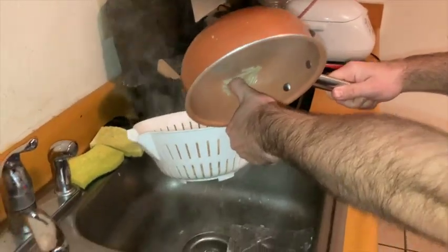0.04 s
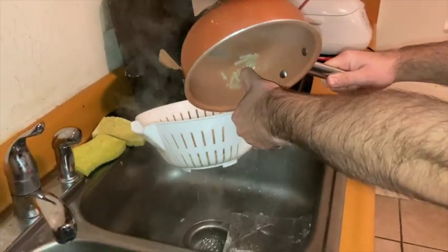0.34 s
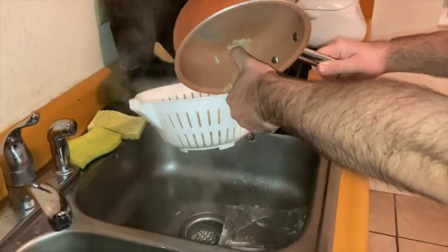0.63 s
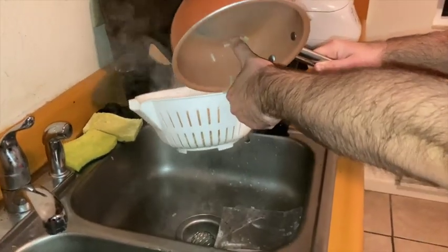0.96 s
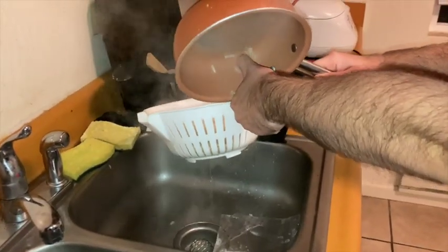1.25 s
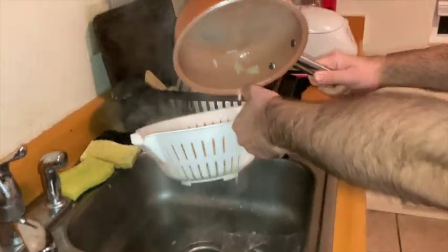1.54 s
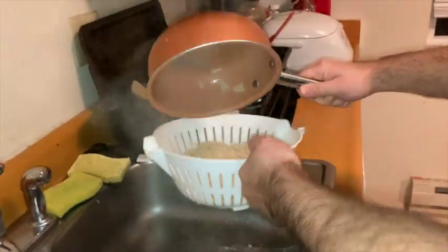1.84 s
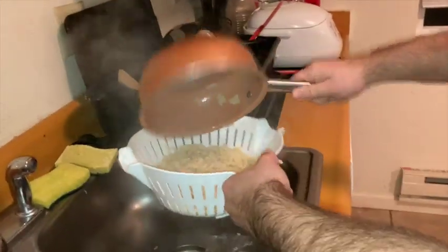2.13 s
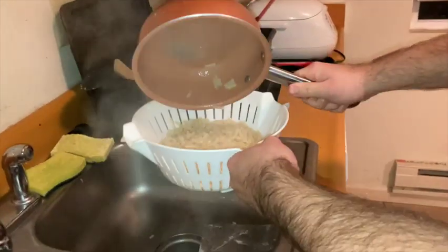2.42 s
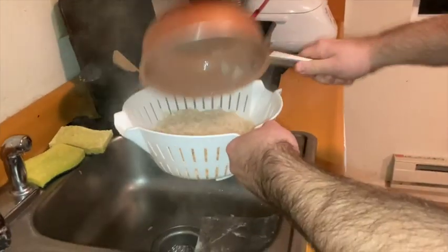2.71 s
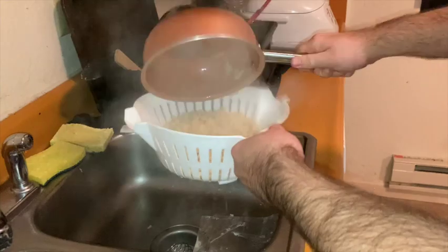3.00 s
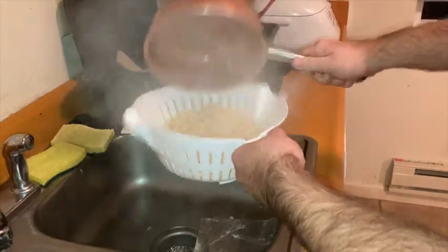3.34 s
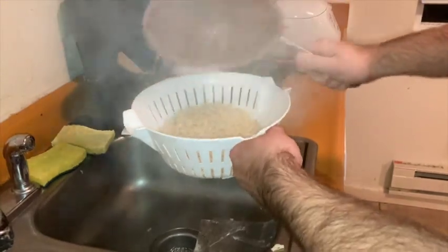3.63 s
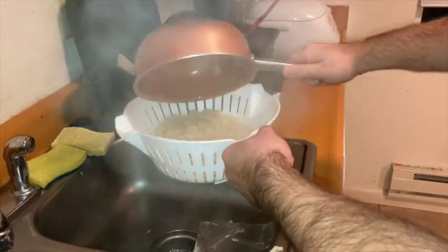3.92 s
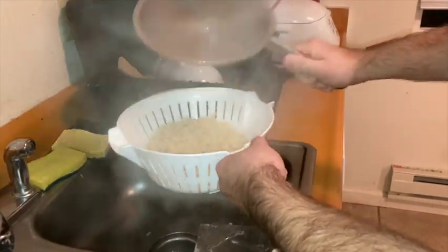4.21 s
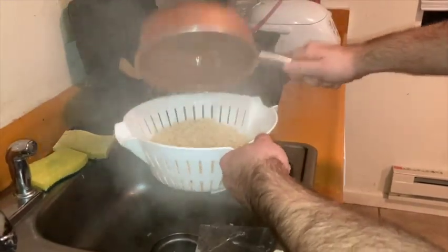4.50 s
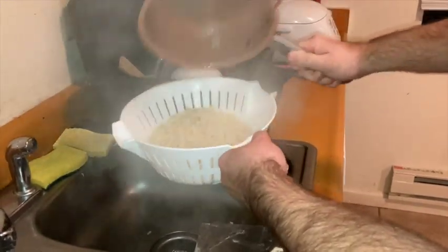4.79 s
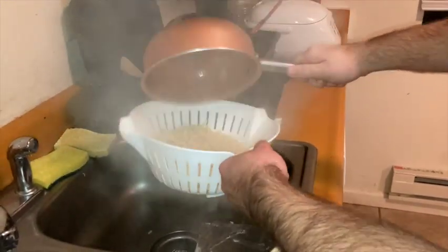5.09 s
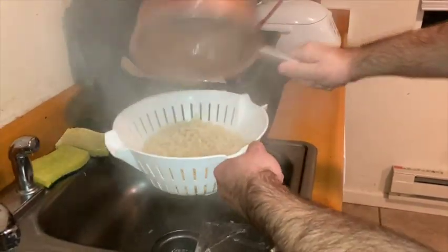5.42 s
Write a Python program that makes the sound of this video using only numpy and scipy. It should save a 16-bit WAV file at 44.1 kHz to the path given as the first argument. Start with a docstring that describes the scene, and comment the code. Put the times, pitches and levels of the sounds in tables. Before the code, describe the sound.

The sound is close, above the sink in a small kitchen with short, hard reflections and a faint, low fan hum throughout. For the first 2.5 seconds, fingers sweep wet pasta from a metal saucepan, making quiet sticky smacks and tiny pops with faint rubbing. The pan gives a dull bump on a plastic colander at about 0.6 seconds and softer ones between 1.1 and 1.3, where clumps land with low plops. A sharper wet smack and plop come at 1.7, and another bump at 2.3. From 2.5 seconds to the end at about 5.5, the pan knocks hard on the colander's rim seventeen times, evenly, about five a second. These are much louder, hollow plastic clacks, each slightly different in tone, with a faint metallic ring and often a light rebounding tap. The strongest fall around 3.5 to 3.7 seconds.

```python
"""Wet smacks and soft bumps: fingers sweep drained pasta from a metal saucepan into a plastic colander.
Then the pan is knocked hard on the rim, five times a second, to shake the pasta out over the sink.
Each knock clacks the colander's modes, rings the pan faintly, and mostly sets the rim rebounding.
The pasta peels off in tiny pops, the fingers stick and slip on the metal,
and a small hard kitchen with a humming fan answers."""
import sys
import numpy as np
from scipy import signal
from scipy.fft import rfft, irfft
from scipy.io import wavfile

SR = 44100
rng = np.random.default_rng(int(sys.argv[2]) if len(sys.argv) > 2 else 0)


def log_audio(samples):
    """Write samples as a 16-bit WAV file to the path given in sys.argv[1]."""
    # one column per channel
    frames = np.atleast_2d(samples).T
    # limit to full scale, then quantise
    limited = np.clip(frames, -1, 1)
    pcm = np.round(limited * 32767).astype(np.int16)
    wavfile.write(sys.argv[1], SR, pcm)


N = 244755
SIZE = 16384  # samples in a one-shot
T, HZ = np.arange(SIZE) / SR, np.fft.rfftfreq(SIZE, 1 / SR)


# hard hits of pan on rim: t/s, level/dB, thud/dB, boom/dB, hollow/dB (high if square, low if glancing),
# hollow/Hz, clack/dB, clack/Hz, rim note/Hz, rim note/dB, tick/dB, contact/s
KNOCK_HITS = [(2.498, -10.5, 0.5, -20, 5, 630, -12, 1140, 2570, 6, -3, 0.0028),
              (2.67, -10, -13, 11, -13, 685, 0.5, 1210, 3270, 8.5, 1, 0.0036),
              (2.8159, -18, 13, -1, 10.5, 640, 4.5, 1090, 3480, 16, 6, 0.0036),
              (2.9961, -10.5, 6, -2.5, 7.5, 590, -1, 885, 1825, 8, -2.5, 0.0012),
              (3.167, -8, 8, 4.5, 0, 605, 1.5, 1150, 3280, 8.5, 4, 0.0021),
              (3.344, -9.5, 0, 7, 5.5, 700, -4.5, 1000, 1740, 3, 7.5, 0.0044),
              (3.534, -1.5, -7, 4, -6, 646, -2, 1460, 2810, 1.5, -5, 0.0026),
              (3.7054, -4, -.5, 1.5, -8.5, 720, 1.5, 1210, 1680, 5, -0.5, .005),
              (3.9119, -6, -8, 4.5, -9.5, 700, -3, 1000, 5150, 7, 1.5, 0.0064),
              (4.076, -6, 4, -3.5, 8.5, 685, -3.5, 910, 1790, -1, 1.5, 0.0011),
              (4.2806, -5, -2.5, -1.5, -4, 527, 2.5, 1250, 2090, 11.5, 0, 0.0064),
              (4.4578, -8, 6, -2.5, 6, 690, -2.5, 1200, 4350, 6, 4.5, 0.0014),
              (4.661, -11, 6, -7, 8.5, 640, 2.5, 1290, 2600, 11.5, 3.5, 0.0019),
              (4.85, -7, 4.5, 3, 2, 720, -0.5, 1180, 4000, 5.5, 2, .0035),
              (5.0596, -8.5, 5, -8, -4, 660, 4.5, 1190, 1635, -5, 3.5, .004),
              (5.2577, -7.5, 4.5, 1.5, 10.5, 583, -3.5, 1230, 1835, 12.5, 4, 0.0021),
              (5.469, -8, 5.5, -5.5, -3, 593, 3.5, 1216, 5100, 6, 6.5, 0.015)]
# EQ of a bare contact: f/Hz, level/dB
BARE_EQ = [(120, 6), (200, 0.5), (280, 2), (450, 3.5), (630, 0.5), (850, 5.5), (1200, 2), (3500, 3.5),
           (10000, -2.5)]

def knocks(ring_db=6.5, room_share=0.35):
    """Each knock clacks the colander and rings the pan, the more so when it lands squarely."""
    out = np.zeros((2, N))
    for (s, db, thud_db, boom_db, hollow_db, hollow_hz,
         clack_db, clack_hz, rim_hz, rim_db, tick_db, contact_s) in KNOCK_HITS:
        spot = spot_eq(hollow_hz, clack_hz, rim_hz, rim_db)
        # part of the spot's emphasis radiates all round, the rest only toward the listener
        colour = contact_eq(thud_db, boom_db, hollow_db, clack_db, tick_db) + room_share * spot
        blow = equalise(colander(contact_s), db + curve(BARE_EQ, HZ) + colour)
        ring = amp(db + ring_db + hollow_db) * pan(db)
        add(out, s, kitchen(blow + ring, direct_db=(1 - room_share) * spot + node_eq()))
    return out


# the colander's distinct modes: f/Hz, resonance height/dB, t60/s
COLANDER_MODES = [(114, 14, 0.054), (188, 18.5, 0.041), (264.3, 22.5, 0.078), (327.5, 17, 0.084),
                  (421, 13.5, 0.029), (518, 21, 0.064), (613, 25.5, 0.045), (717, 23.5, 0.039),
                  (886, 21, 0.031), (1058, 22, 0.019), (1217, 23, 0.03), (1429, 21, 0.027),
                  (1654, 19, 0.044), (1831, 20.5, 0.05), (2180, 18.5, 0.06), (2943, 17.5, 0.016),
                  (3500, 7.5, 0.0082), (4096, 22, 0.026)]
# EQ of its wash of crowded modes: f/Hz, level/dB
WASH_EQ = [(100, 2.5), (400, 2.5), (650, 21.5), (950, 1.5), (1500, 13), (2300, 13), (3500, 15.5),
           (6500, 17), (7800, 17.5), (8800, 19), (10400, 22.5), (11500, 21), (13000, 14), (15500, 10),
           (17000, -14)]

def colander(contact_s, damping=1, snap_s=0.00028, snap_db=2, wash_t60=0.096, wash_db=-7, modes_db=-1):
    """One blow on plastic: a snap, brief chatter, a wash of crowded modes and a few distinct ones."""
    attack = 1 - np.exp(-T / 0.00033)
    contact = amp(snap_db) * np.exp(-(T / snap_s) ** 2) + np.exp(-(T / contact_s) ** 2)
    envelope = (contact + amp(wash_db) * decay(wash_t60)) * attack
    spectrum = rfft(rng.standard_normal(SIZE) * envelope)
    wash = irfft(spectrum / np.abs(spectrum) ** 0.57) * decay(0.21)  # overlapping modes even out
    sound = equalise(wash / np.linalg.norm(wash), curve(WASH_EQ, HZ))
    for k, (hz, db, t60) in enumerate(COLANDER_MODES):
        pitch = hz * (1 + 0.0097 * rng.uniform(-0.59, 1))  # modes shift with the load
        gain = amp(db + modes_db) * 2 * np.log(1000) / (t60 * SR)
        ring = np.sqrt(damping) * decay(t60 / damping) * np.sin(2 * np.pi * pitch * T)
        sound += (-1) ** k * gain * ring * attack
    return disperse(sound)


def disperse(x, crossing_s=0.001619):
    """High bending waves outrun low ones, so the tick leads the body; crossing_s holds at 1 kHz."""
    turns = crossing_s * (2 * np.sqrt(1000 * HZ) - np.sqrt(1000 / HZ[-1]) * HZ)
    return irfft(rfft(x) * np.exp(-2j * np.pi * turns))


def contact_eq(thud_db, boom_db=0, hollow_db=0, clack_db=0, tick_db=0):
    """Tone of a hit in dB: squareness sets thud, boom and hollow note; the spot sets clack and tick."""
    thud = thud_db / (1 + (HZ / 317) ** 4)  # low shelf: the loaded bowl
    boom = boom_db * bell(hz=256, octaves=0.21)  # the bowl's strongest low mode
    hollow = hollow_db * bell(hz=625, octaves=0.27)
    clack = clack_db * bell(hz=1110, octaves=0.75)
    tick = tick_db * (1 - 1 / (1 + (HZ / 7450) ** 4))  # high shelf: a sharp contact
    return thud + boom + hollow + clack + tick


def spot_eq(hollow_hz, clack_hz, rim_hz, rim_db, hollow_db=3, clack_db=6.5):
    """The struck spot singles out a hollow mode, a clack mode and a high rim note: narrow bells in dB."""
    peaks = [(hollow_hz, hollow_db), (clack_hz, clack_db), (rim_hz, rim_db)]
    return sum(db * bell(hz, octaves=0.09) for hz, db in peaks)


def node_eq(spread_db=1.6):
    """A hit falls near nodes of some upper modes and crests of others: a random ripple in dB."""
    hz = np.geomspace(1400, 9000, num=24)
    ripple = spread_db * rng.standard_normal(len(hz) - 2)
    return np.interp(HZ, hz, np.pad(ripple, 1))


# the hand-damped pan, whose nearly round wall splits modes into beating pairs: f/Hz, level/dB, t60/s
PAN_MODES = [(845, -53, .19), (882, -56, .17), (1179, -57, .28), (1270, -64, .3), (2075, -52, .36),
             (2098, -50, .42), (2842, -56, .35)]

def pan(strength_db, spread_db=2.5, detune=0.004):
    """Thin metal ring: softer blows favour the low modes, and the grip shifts each pitch a little."""
    hz, db, t60 = np.transpose(PAN_MODES)[:, :, None]
    louder, sharper = rng.standard_normal((2, len(PAN_MODES), 1))
    tilt_db = 0.3 * strength_db * np.log2(hz / 2000)
    gain = amp(db + spread_db * louder + tilt_db)
    pitch = hz * (1 + detune * sharper)
    return np.sum(gain * decay(t60) * np.sin(2 * np.pi * pitch * T), axis=0)


# ghost hits after a contact: t/s, level/dB
REBOUND_HITS = [(0.7077, -40), (3.005, -19.5), (3.189, -17), (3.353, -14), (3.355, -19), (3.5503, -17.5),
                (3.717, -20), (4.0856, -15.5), (4.0954, -16.5), (4.2856, -37), (4.469, -17), (4.6689, -20),
                (4.6816, -19), (4.871, -16), (4.8906, -21), (5.078, -34), (5.08, -20), (5.2665, -13.5),
                (5.2701, -20), (5.489, -12.5), (5.5008, -15.5)]
# EQ of a light contact: f/Hz, level/dB
REBOUND_EQ = [(150, 4), (600, 4.5), (1300, 8), (5000, 4.5), (12000, -2.5)]

def rebounds():
    """The springy rim comes back against the pan in a light tap or two."""
    out = np.zeros((2, N))
    for s, db in REBOUND_HITS:
        tap = equalise(colander(contact_s=0.0053), db + curve(REBOUND_EQ, HZ))
        add(out, s, kitchen(tap, direct_db=node_eq()))
    return out


# soft hits during the sweep: t/s, level/dB, thud/dB, treble/dB, pan ring/dB
BUMP_HITS = [(0.6419, -14, 0, -4.5, 7), (1.067, -25.5, 8, -4.5, -4), (1.1638, -31.5, 16, -8, -8.5),
             (1.241, -30.5, 6, 3, -15.5), (2.346, -20.5, -32, 2, -10.5)]
# EQ of a cushioned contact: f/Hz, level/dB
CUSHIONED_EQ = [(250, 6), (600, 8), (860, 2), (1350, 6), (2000, 3), (3500, -2.5), (7000, -13), (11000, -20)]
# the hand inside the pan mutes its upper modes: f/Hz, level/dB
PALM_EQ = [(1300, 0), (2000, -18)]

def bumps(cushion_db=-20):
    """Cushioned by hand and pasta, the pan nudges the rim: a dull, damped hit; its low notes hum on."""
    out = np.zeros((2, N))
    treble = curve([(1200, 0), (4000, 1)], HZ)
    for s, db, thud_db, treble_db, ring_db in BUMP_HITS:
        colour = curve(CUSHIONED_EQ, HZ) + contact_eq(thud_db) + treble_db * treble
        blow = equalise(colander(contact_s=0.0063, damping=1.5), db + colour)
        ring = equalise(pan(db + cushion_db), ring_db + curve(PALM_EQ, HZ))
        add(out, s, kitchen(blow + ring))
    return out


# wet smacks, long where the pasta slides off: t/s, level/dB, decay/s, brightness/dB
PASTA_SMACKS = [(0.021, -49.5, 0.019, -2), (0.088, -61, 0.01, -3), (0.315, -69, 0.002, 8),
                (0.469, -54.5, 0.013, 0), (0.563, -53, 0.011, -6), (1.026, -62, 0.05, 19),
                (1.172, -44.5, 0.039, -1), (1.208, -37, 0.002, 7), (1.263, -38, 0.0034, -17),
                (1.252, -38.5, 0.0092, -21), (1.41, -50.5, 0.024, 6), (1.701, -38, 0.0087, 10.5),
                (1.709, -28, 0.0083, 0.5), (1.769, -48, 0.004, 17.5), (1.872, -45.5, 0.0069, 4),
                (1.89, -53.5, 0.0056, 27.5), (1.943, -48, 0.0091, 3), (2.249, -47.5, 0.054, -1),
                (2.417, -47.5, 0.48, 1)]

def pasta(pops_per_s=1800, smack_db=-9, sweep_s=2.5, strays_per_s=12, stray_db=-62):
    """Wet pasta peels off the pan in bursts of tiny pops, with a faint stray crackle in between."""
    out = np.zeros((2, N))
    wet_eq = curve([(100, -25), (600, 12.5), (1500, 4.5), (3000, 2.5),
                    (6000, -2), (11000, -5), (16000, -15)], HZ)
    tilt = curve([(1500, -0.5), (10000, 1)], HZ)
    for s, db, decay_s, bright_db in PASTA_SMACKS:
        envelope = np.exp(-T / decay_s) * (1 - np.exp(-T / (0.13 * decay_s)))
        burst = unit_rms(crackle(pops_per_s) * envelope) * np.sqrt(decay_s / (2 * T[-1]))
        add(out, s, kitchen(equalise(burst, db + smack_db + wet_eq + bright_db * tilt)))
    for s in rng.uniform(0, sweep_s, round(sweep_s * strays_per_s)):
        pop = rng.standard_normal(SIZE) * decay(0.013)
        db = stray_db + 4 * rng.standard_normal()
        add(out, s, kitchen(equalise(pop, db + wet_eq)))
    return out


# low plops of landing pasta: t/s, f/Hz, level/dB, t60/s
CLUMP_PLOPS = [(1.075, 260, -36, 0.12), (1.245, 71, -33.5, 0.32), (1.248, 155, -33.5, 0.096),
               (1.709, 202.6, -30.5, 0.21), (1.713, 262, -34, 0.4)]

def clumps(attack_s=0.0065):
    """Clumps drop into the colander, each a dull, soft-edged low tone."""
    out = np.zeros((2, N))
    for s, hz, db, t60 in CLUMP_PLOPS:
        envelope = amp(db) * decay(t60) * (1 - np.exp(-T / attack_s))
        add(out, s, to_ports(envelope * np.sin(2 * np.pi * hz * T)))
    return out


# finger strokes along the pan: t/s, length/s, level/dB
RUB_STROKES = [(1.141, 0.096, -59), (1.262, 0.032, -49.5), (1.352, 0.081, -53), (1.634, 0.081, -55)]
# resonances the rubbing stirs: f/Hz, level/dB
RUB_EQ = [(200, -2), (430, -6), (520, 10), (580, -2), (645, 3), (760, -8), (890, -6), (980, 0), (1090, 4),
          (1400, -13), (4000, -28), (12000, -45)]
# fingertip chirps: t/s, f/Hz, level/dB, length/s
FINGER_SQUEAKS = [(0.3115, 3850, -57, 0.006), (1.2125, 4400, -42, 0.005)]

def fingers(slips_per_s=300, jitter=0.29):
    """Wet fingers stick and slip on the pan in short strokes; very quick slips make a rough squeak."""
    out = np.zeros((2, N))
    for s, length, db in RUB_STROKES:
        rub = unit_rms(equalise(crackle(slips_per_s), curve(RUB_EQ, HZ)))
        add(out, s, kitchen(amp(db) * swell(length) * rub))
    for s, hz, db, length in FINGER_SQUEAKS:
        turns = np.cumsum(hz * (1 + jitter * rng.standard_normal(SIZE))) / SR
        squeak = amp(db) * swell(length) * np.sin(2 * np.pi * turns)
        add(out, s, kitchen(squeak, reverb_db=-11))
    return out


# reverb EQ: f/Hz, level/dB
REVERB_EQ = [(100, -6.5), (260, 8.5), (500, 0), (1000, -1), (1500, 0), (2500, 1), (5000, -1.5),
             (10000, -2.5), (15000, -3.5)]
# reverb time: f/Hz, t60/s
REVERB_T60 = [(150, 0.093), (400, 0.31), (650, 0.26), (1200, 0.35), (2700, 0.34), (7000, 0.32),
              (11000, 0.25), (15000, 0.18)]

def kitchen(x, direct_db=0, reverb_db=0, build_s=0.0004, wall_s=0.018, wall_db=-14, left_db=0.27):
    """Direct sound, a wall's slap and a diffuse tail, new for each hit because the pan keeps moving."""
    hz, t, noise = signal.stft(diffuse_noise(SIZE), SR, nperseg=256)
    t60 = curve(REVERB_T60, hz)[:, None]
    gain = amp(curve(REVERB_EQ, hz))[:, None] * np.sqrt(2 * np.log(1000) / (t60 * SR))
    tail = signal.istft(noise * gain * np.exp(-np.log(1000) * t / t60), SR, nperseg=256)[1]
    tail = tail[:, :SIZE] * (1 - np.exp(-(T / build_s) ** 2))
    slap_at = (wall_s * SR * rng.uniform(0.95, 1.05, 2)).astype(int)
    tail[[0, 1], slap_at] += amp(wall_db)
    tail *= amp([[left_db], [-left_db]])
    reverb = signal.fftconvolve(x[None], tail, axes=1)[:, :SIZE]
    direct = to_ports(equalise(x, direct_db + np.zeros(len(HZ))))
    return direct + amp(reverb_db) * reverb


# how far the left microphone port leads the right: f/Hz, phase/rad
LEFT_LEAD = [(60, 0), (250, 0.52), (500, 1), (1100, 0.9), (2600, 1.88), (5200, 2), (7400, 1.14),
             (9100, -3.5), (11400, -6), (13600, -7.5), (15700, -4.5)]

def to_ports(x, shade_db=5):
    """The two microphone ports: the right one hears each sound shifted in phase and shaded in the mids."""
    shade = curve([(300, 0), (700, 1), (1200, 1), (2500, 0.4), (5000, 0)], HZ) * shade_db / 2
    left, right = amp(shade), amp(-shade) * np.exp(-1j * curve(LEFT_LEAD, HZ))
    fade_out = np.minimum(1, 20 * (1 - T / T[-1])) ** 2
    return irfft(rfft(x) * np.array([left, right])) * fade_out


# stereo image of the ambience: f/Hz, left-right coherence (-1..1)
COHERENCE = [(60, 0.98), (250, 0.96), (500, 0.43), (900, 0.19), (2000, 0.36), (6000, -0.27), (7300, -0.99),
             (9000, 1), (15000, -0.89)]

def diffuse_noise(size):
    """White noise from all sides: near mono in the bass, wide in the mids, in or out of phase on top."""
    left, unrelated = rfft(rng.standard_normal((2, size)))
    hz = np.fft.rfftfreq(size, 1 / SR)
    same = np.clip(curve(COHERENCE, hz), -1, 1)
    right = same * left * np.exp(-1j * curve(LEFT_LEAD, hz)) + np.sqrt(1 - same ** 2) * unrelated
    return irfft(np.array([left, right]), size)


# motor tones: f/Hz, rms level/dB
FAN_TONES = [(118.4, -57.5), (215.3, -72), (242.2, -62.5), (398.4, -80), (425.3, -65.5), (1066, -77.5),
             (3122, -86), (3215, -88)]
# EQ of the air bed: f/Hz, level/dB
FAN_AIR_EQ = [(20, -12), (38, -20), (54, 1), (90, 0.5), (160, -7.5), (280, 3), (400, -8.5), (700, -13),
              (1300, -23), (2400, -32.5), (2900, -38.5), (3170, -31), (3500, -36.5), (7000, -49),
              (11000, -43), (16000, -65)]

def fan(air_db=-51, waver=0.27):
    """A low rush of air under slightly wavering motor tones."""
    t = np.arange(N) / SR
    air_gain = amp(curve(FAN_AIR_EQ, np.fft.rfftfreq(N, 1 / SR)))
    air = irfft(rfft(diffuse_noise(N)) * air_gain, N)
    knots = np.linspace(0, t[-1], num=24)
    hum = 0
    for hz, db in FAN_TONES:
        drift = np.interp(t, knots, rng.standard_normal(len(knots)))
        phase = 2 * np.pi * (hz * t + rng.random()) + np.pi * waver * drift
        hum += amp(db) * np.sqrt(2) * np.sin(phase)
    return amp(air_db) * unit_rms(air) + hum


def amp(db):
    """Decibels to gain."""
    return 10 ** (np.asarray(db) / 20)


def unit_rms(x):
    """Scales to rms 1."""
    return x / np.sqrt(np.mean(x ** 2) + 1e-20)


def curve(points, hz):
    """Reads breakpoints along a log-frequency axis."""
    f, value = np.transpose(points)
    return np.interp(np.log(hz + 1), np.log(f + 1), value)


def bell(hz, octaves):
    """An EQ bell of height 1 around hz, with the given half width."""
    return np.exp(-0.5 * (np.log2((HZ + 1) / hz) / octaves) ** 2)


def equalise(x, db):
    """Minimum-phase EQ with the given gain at each frequency: nothing rings ahead of the hit."""
    cepstrum = irfft(np.log(amp(db)))
    cepstrum[1:SIZE // 2] *= 2
    cepstrum[SIZE // 2 + 1:] = 0
    return irfft(rfft(x) * np.exp(rfft(cepstrum)))


def decay(t60):
    """Envelope that falls 60 dB in t60 seconds."""
    return np.exp(-np.log(1000) * T / np.maximum(t60, 1e-4))


def swell(length_s):
    """Half-sine envelope."""
    return np.sin(np.pi * np.minimum(T / length_s, 1))


def crackle(per_s):
    """Clicks of random size at random times."""
    return rng.standard_normal(SIZE) * (rng.random(SIZE) < per_s / SR)


def add(mix, s, sound):
    """Drops a stereo sound into the mix at time s."""
    part = mix[:, round(s * SR):][:, :sound.shape[1]]
    part += sound[:, :part.shape[1]]


def scene():
    """Everything heard from above the sink."""
    return knocks() + rebounds() + bumps() + pasta() + clumps() + fingers() + fan()


def record(dry):
    """A small microphone: low cut at 14 Hz, soft clipping near full scale, high cut at 16.3 kHz."""
    thinned = signal.sosfilt(signal.butter(2, 14, "highpass", fs=SR, output="sos"), dry)
    rounded = thinned / (1 + thinned ** 4) ** (1 / 4)
    lowpass = signal.firwin(511, 16300, window=("kaiser", 9), fs=SR)
    return signal.oaconvolve(rounded, lowpass[None], "same")


dry = scene()
out = record(dry)
log_audio(out)
```